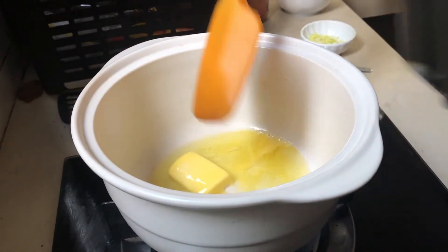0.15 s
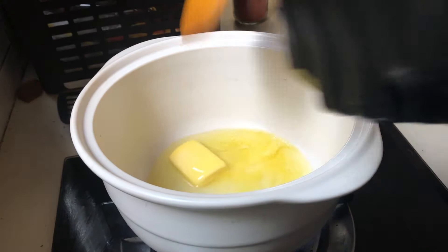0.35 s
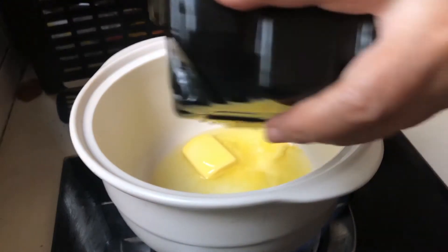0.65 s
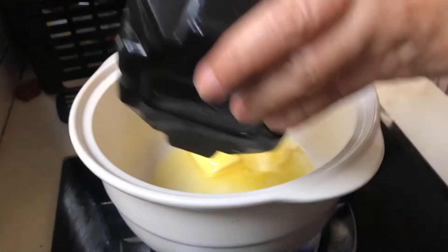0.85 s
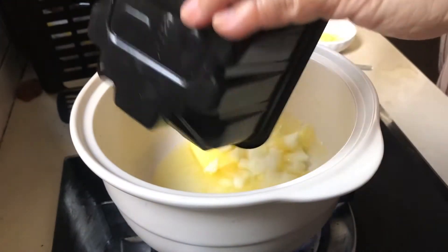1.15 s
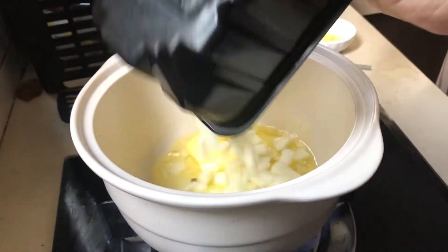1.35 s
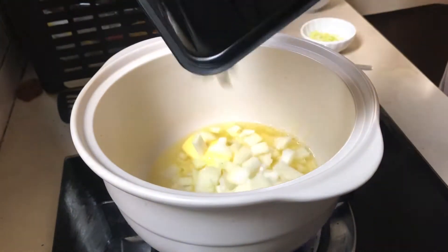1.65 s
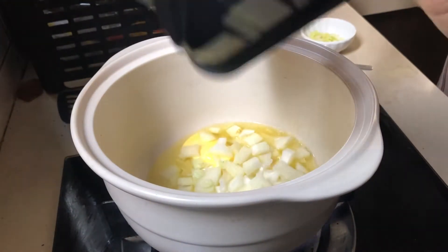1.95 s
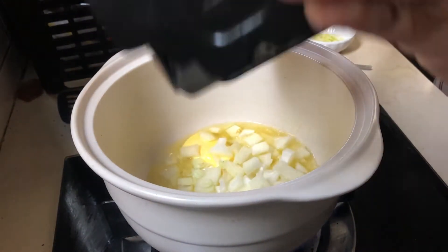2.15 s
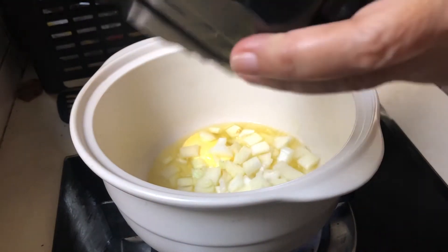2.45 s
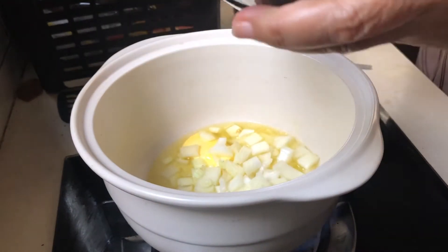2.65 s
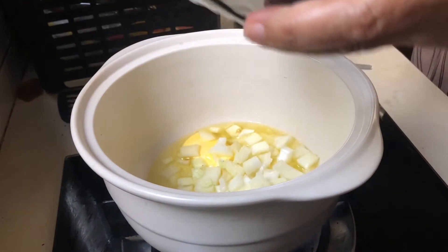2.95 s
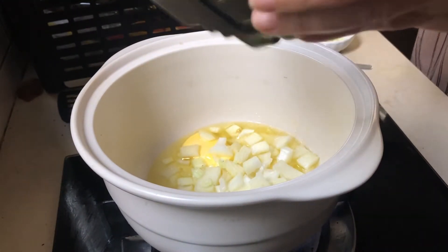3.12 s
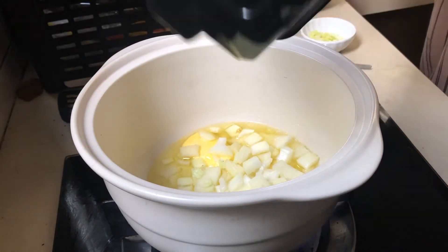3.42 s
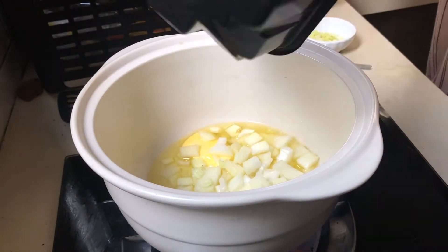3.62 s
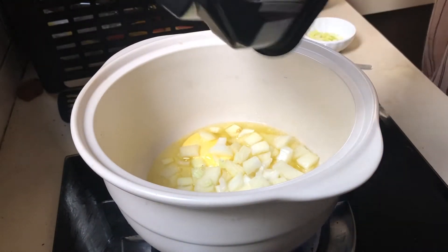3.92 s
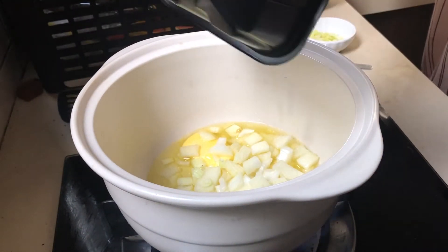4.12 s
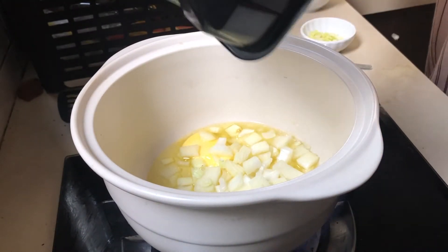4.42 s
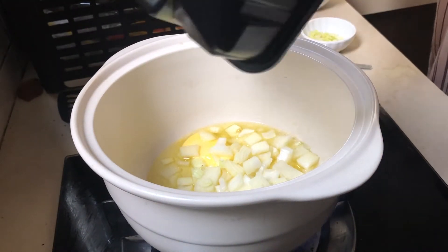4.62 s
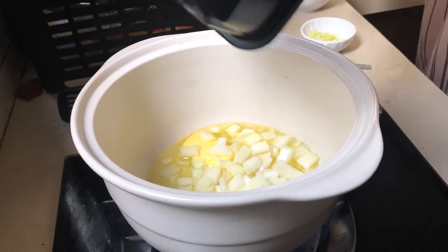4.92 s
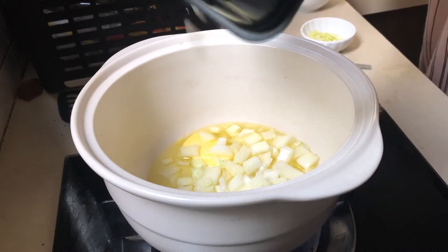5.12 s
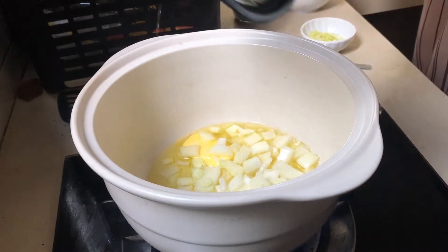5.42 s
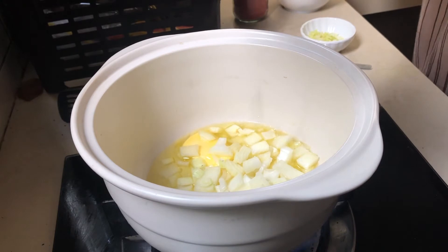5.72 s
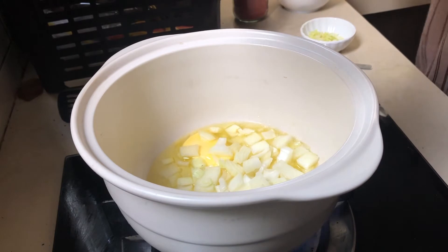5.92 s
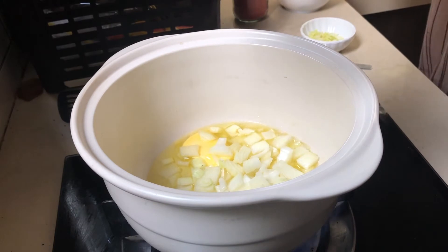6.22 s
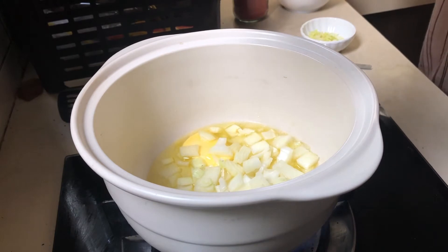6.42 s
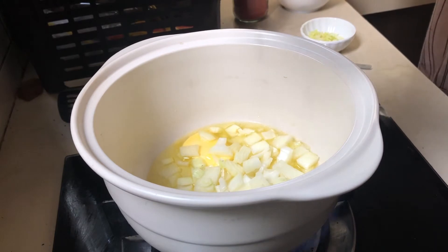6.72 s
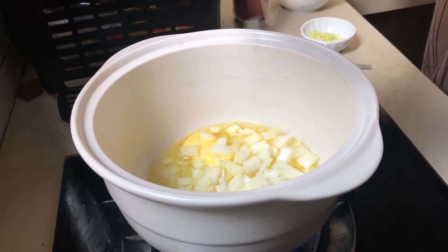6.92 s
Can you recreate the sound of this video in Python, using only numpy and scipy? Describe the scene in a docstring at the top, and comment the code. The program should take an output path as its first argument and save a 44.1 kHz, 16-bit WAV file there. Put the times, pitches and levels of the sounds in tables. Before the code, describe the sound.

Close, dry kitchen sound in one channel. Butter fizzes faintly over a low fluttering gas flame, then diced onion rushes out of a thin plastic tub with a sharp knock and soft rattle. The sizzle swells with bright pops while a spatula taps and scrapes the tub, its bottom thudding loosely. Knocks thin out near the end as the crackling continues.

```python
"""In a kitchen, close up, diced onion is tipped from a thin plastic tub into hot butter in a stoneware pot.
Water droplets pop, crackle and sizzle in the fat: noise snaps that also ring the air of the pot.
A spatula taps and scrapes the tub (noise blows on tuned wall modes) and its bottom thuds as it flexes
(sagging swings), while the dice rattle out. A gas burner flutters low beneath, as slowly wavering noise."""
import sys
import numpy as np
from scipy import signal
from scipy.fft import rfft, irfft
from scipy.io import wavfile
from scipy.ndimage import uniform_filter1d

SR = 44100
rng = np.random.default_rng(int(sys.argv[2]) if len(sys.argv) > 2 else 0)


def wrap_up_sound(samples):
    """Save the sound to the file named by the first command line argument, as 16-bit audio."""
    columns = np.atleast_2d(samples).T
    # keep every value between -1 and 1, then stretch to whole-number steps
    tamed = np.clip(columns, -1, 1)
    steps = np.round(tamed * 32767).astype(np.int16)
    wavfile.write(sys.argv[1], SR, steps)


N = 311787  # length in samples

# Loud droplets bursting in the fat. Each row: start in seconds, peak in dB before POP_DB, pitch in Hz.
DROPLET_POPS = [(0.018, -29, 9100), (0.1235, -24, 6200), (0.6467, -27, 6200), (0.6817, -24, 10900),
                (1.0667, -24, 9500), (1.0856, -18, 11200), (1.0898, -20, 6600), (1.1358, -19, 6600),
                (1.3045, -19, 5800), (1.457, -22, 9300), (1.5596, -23, 9300), (1.814, -23, 8400),
                (1.8226, -21, 10900), (1.8354, -19, 6100), (1.9413, -16, 11100), (1.9848, -20, 12200),
                (2.0154, -17, 7500), (2.0434, -14, 8600), (2.1098, -16, 7200), (2.1189, -21, 11800),
                (2.1601, -20, 9100), (2.2624, -18, 7200), (2.2986, -16, 7900), (2.3407, -21, 6900),
                (2.4096, -23, 10500), (2.4586, -21, 7700), (2.4758, -12, 6200), (2.5041, -17, 5400),
                (2.5195, -21, 8700), (2.5329, -17, 8800), (2.5662, -17, 8900), (2.5823, -17, 6200),
                (2.5924, -18, 8200), (2.6009, -20, 9000), (2.6628, -18, 8400), (2.711, -11, 7300),
                (2.7442, -13, 6900), (2.7592, -20, 10200), (2.7664, -15, 6200), (2.7987, -21, 12600),
                (2.9422, -23, 10800), (2.9639, -14, 7700), (3.039, -19, 7900), (3.1082, -14, 7900),
                (3.1233, -15, 5700), (3.2026, -23, 10500), (3.2092, -20, 5200), (3.2236, -24, 5800),
                (3.2322, -21, 5900), (3.2573, -23, 11500), (3.2631, -19, 7100), (3.2741, -21, 5200),
                (3.283, -20, 5200), (3.291, -22, 5900), (3.2931, -18, 9400), (3.3108, -22, 6000),
                (3.3418, -21, 12100), (3.3606, -19, 10200), (3.4402, -16, 11700), (3.4609, -19, 8300),
                (3.5724, -18, 10100), (3.5948, -14, 5500), (3.6586, -15, 10800), (3.6712, -15, 6000),
                (3.7264, -15, 9600), (3.7386, -10, 5600), (3.7963, -18, 12400), (3.8077, -19, 8400),
                (3.8553, -18, 8100), (3.9136, -20, 10000), (4.0147, -21, 10100), (4.0801, -19, 5600),
                (4.0971, -20, 8000), (4.1211, -20, 11300), (4.1715, -23, 10100), (4.2359, -19, 7100),
                (4.25, -20, 8300), (4.291, -12, 12500), (4.3156, -19, 8100), (4.3904, -19, 6900),
                (4.4009, -14, 11400), (4.4397, -20, 7100), (4.452, -15, 13000), (4.5432, -22, 7300),
                (4.567, -11, 8500), (4.5875, -11, 13200), (4.6121, -17, 5500), (4.6327, -14, 6300),
                (4.6977, -19, 11800), (4.7311, -22, 8100), (4.7481, -22, 9800), (4.7678, -19, 10800),
                (4.852, -22, 9800), (4.9276, -14, 11500), (4.9387, -21, 7800), (4.9687, -16, 5800),
                (4.9777, -18, 13300), (4.9876, -13, 10100), (5.0293, -13, 5700), (5.0871, -18, 10600),
                (5.1181, -14, 5000), (5.1551, -19, 5200), (5.165, -21, 8300), (5.1738, -22, 9300),
                (5.18, -22, 11400), (5.2103, -12, 8200), (5.2589, -18, 11400), (5.2715, -19, 11900),
                (5.2941, -20, 12000), (5.3259, -20, 6900), (5.3363, -20, 8500), (5.3581, -16, 9100),
                (5.3715, -10, 6000), (5.4642, -20, 7400), (5.5098, -23, 11400), (5.5238, -21, 9100),
                (5.5808, -14, 11000), (5.621, -20, 6400), (5.6759, -19, 9800), (5.7403, -15, 8300),
                (5.7633, -20, 8200), (5.8133, -21, 5500), (5.825, -27, 3600), (5.8985, -23, 4200),
                (6.0482, -24, 6500), (6.1069, -19, 5500), (6.1476, -17, 6600), (6.1781, -19, 10300),
                (6.2277, -18, 5200), (6.2687, -26, 6100), (6.3223, -19, 7000), (6.3401, -20, 5200),
                (6.3543, -20, 9000), (6.3644, -23, 7000), (6.4191, -17, 6900), (6.4787, -21, 8300),
                (6.5003, -14, 10300), (6.523, -24, 9000), (6.5368, -7, 10300), (6.5442, -17, 9200),
                (6.596, -18, 7500), (6.5988, -13, 7800), (6.6086, -14, 9300), (6.6738, -18, 6900),
                (6.6956, -22, 9200), (6.7453, -14, 7900), (6.8543, -23, 8000), (6.9535, -23, 8200),
                (7.0295, -13, 10100)]
# Knocks on the tub. Each row: time in seconds, peak in dB, low wall modes in dB and upper modes in dB,
# both against the modes near 1.1 kHz.
TUB_KNOCKS = [(0.1222, -25, -4, 3), (0.5058, -38, -1, -16), (0.649, -34, 2, -12), (0.715, -30, -8, -13),
              (0.7339, -27.5, -13, 6), (0.7716, -26.5, 23, -9), (0.7903, -24.5, -16, -6.5),
              (0.8398, -18, -6, -4), (0.8646, -10.5, -9, 20), (0.938, -24, -3, -15), (1.012, -35, 2, -8),
              (1.0376, -19, 2, -5), (1.059, -22, -3, -9), (1.089, -21.5, -9, 1), (1.101, -27, -1, -4),
              (1.118, -22, -6, -1), (1.202, -26, -7, -1), (1.2476, -19.5, -1, -2.5), (1.285, -32, 10, -8),
              (1.321, -30, 6, 3), (1.347, -24.5, 10, 6), (1.367, -24.5, 19, -16), (1.399, -26, 15, -20),
              (1.476, -31.5, 6, -2), (1.514, -30, 4, -12), (1.631, -33, 14, -14), (1.86, -34.5, 8, -10),
              (1.963, -29, -10, 0), (2.0111, -23, -1, -2), (2.128, -30, 1, -20), (2.191, -15, -10, -10),
              (2.1965, -6, -10, -2.5), (2.2947, -23.5, -8, -6), (2.3361, -25, -26, -13),
              (2.6272, -12.5, -1.5, -7.5), (2.7469, -22.5, -9, -3.5), (2.791, -13.5, 2.5, -8),
              (2.825, -18, -22, -21), (2.8779, -20, -6, 2), (2.945, -21.5, -8, -4),
              (2.973, -15, -5.5, -0.5), (3.0157, -13, -5.5, -5), (3.13, -22.5, -3, -12),
              (3.139, -19, -7, -2), (3.15, -27, -5, -10), (3.3185, -16.5, -4, -7), (3.348, -21, -6, -5),
              (3.357, -20, -12, -9), (3.3699, -13.5, -4, 3), (3.4231, -21, -0.5, -4),
              (3.5078, -19.5, -22, 0), (3.5347, -24, -40, -4), (3.6252, -28.5, -32, -1),
              (3.679, -16.5, 2, -2.5), (3.764, -32, 5, -3), (3.795, -25, 7, 3), (3.8152, -8.5, -6, -3),
              (3.8491, -16.5, -3, 5), (3.8819, -14.5, -5.5, -12), (3.998, -25.5, -25, -6),
              (4.0196, -19, 9, 1.5), (4.0872, -26.5, -7, -6), (4.1048, -17, -6, 1),
              (4.2205, -24.5, -2.5, -5.5), (4.4582, -18, -3, 5), (4.5146, -24.5, -1, -3),
              (4.691, -34.5, 1, -3), (4.881, -8.5, -9, -5), (4.929, -24, 4, 1), (4.941, -17, -4, -1),
              (5.031, -9.5, -10, 7), (5.0733, -16.5, -18, -15), (5.135, -18.5, 1, -3.5),
              (5.3655, -14.5, -3, -3.5), (5.4916, -17, -0.5, -8.5), (5.6057, -23, -7, 13),
              (5.8, -33, -16, -4), (5.863, -26.5, -10, -6.5), (5.9838, -16, -10.5, -5),
              (6.136, -20, 1, -5.5), (6.209, -32.5, -20, -6), (6.2454, -29.5, -12, -9),
              (6.34, -26.5, 2, -3.5), (6.3824, -24, -5, -10), (6.421, -26, -17, -21),
              (6.444, -23.5, -16, -6), (6.75, -25.5, -1, -7), (6.765, -17, -3, -1.5),
              (6.8348, -24, -12, -7), (6.9047, -36, -11, 7), (6.916, -28, -6, -9), (6.964, -31, -18, 0)]
# The bottom of the tub flexes. Each row: time of the peak in seconds, peak in dB, pitch at the peak in Hz.
BOTTOM_THUDS = [(0.511, -28.5, 257), (2.017, -17, 254), (2.113, -23, 217), (2.206, -21.5, 230),
                (2.761, -19.5, 112), (2.808, -25, 162), (2.973, -23, 215), (3.014, -22.5, 187),
                (3.032, -18.5, 133), (3.142, -17.5, 155), (3.379, -14, 201), (3.453, -16.5, 270),
                (3.52, -20.5, 181), (3.695, -28, 159), (3.801, -18.5, 208), (3.83, -11, 198),
                (4.119, -20, 92.8), (4.471, -21.5, 198), (4.525, -19.5, 175), (4.9, -17, 232),
                (4.961, -17.5, 160), (5.043, -24, 157), (5.147, -24, 170), (5.374, -16.5, 158),
                (5.501, -12.5, 148), (5.868, -29, 190), (5.99, -19, 291), (6.145, -21, 226),
                (6.344, -28.5, 297), (6.431, -27, 188), (6.647, -22, 124), (6.909, -26, 263),
                (6.937, -33, 230)]
# Onion dice slide out in a rush, then trickle. Each row: time in seconds, relative level in dB.
DICE_SLIDE = [(.68, -81), (.83, -53), (.88, -28), (.93, -31), (.99, -38), (1.05, -44), (1.2, -45.5),
              (1.39, -49.5), (1.44, -53), (1.52, -62), (1.75, -59)]
# How lively the fat is. Each row: time in seconds, level in dB that the crackle and hiss are set against.
FAT_HEAT = [(0, -50), (.4, -59), (.7, -54), (.87, -40), (.98, -48.5), (1.1, -37), (1.3, -45.5), (1.7, -46),
            (2.0, -40), (2.35, -41.5), (2.58, -39), (2.9, -42), (3.05, -38.5), (3.18, -44.5), (3.3, -39),
            (3.6, -43), (4.1, -43), (4.45, -41), (4.75, -43.5), (5.2, -39.5), (5.6, -43.5), (5.9, -46.5),
            (6.55, -42.5), (7.07, -44)]
# Tub wall modes in four groups: main, low, upper, crack. Each row: pitch in Hz, relative level in dB,
# free decay to -60 dB in seconds, before RING_SHARE.
WALL_MODES = [
    [(990, 0, .045), (1070, 0, .05), (1190, 2, .05), (1320, -3, .03)],
    [(585, -2, .045), (640, 0, .05), (730, -2, .035)],
    [(1560, -2, .02), (1830, 0, .025), (2110, 0, .02), (2350, -3, .015)],
    [(2750, 0, .01), (3150, 0, .01), (3800, -1, .008), (4600, -3, .006)],
]
# Air modes of the pot. Each row: pitch in Hz, gain in dB, decay to -60 dB in seconds.
POT_AIR_MODES = [(1325, 16.5, 0.022), (2600, -3, 0.009)]
# Colour of the fine hiss. Each row: frequency in Hz, relative density in dB per Hz.
HISS_COLOUR = [(880, 1), (1500, 7), (1960, 1), (3550, 7.5), (3960, 3), (5440, 6), (7920, 3.5), (15200, 4),
               (16000, 3.5)]
# Colour of burner and room. Each row: frequency in Hz, relative density in dB per Hz.
KITCHEN_COLOUR = [(18, -51), (30, -10.5), (124, -3), (149, 2), (194, -4.5), (280, -14.5), (384, -14),
                  (415, -18), (449, -20), (499, -19.5), (3220, -34.5), (16000, -50.5)]

POP_DB = 2  # added to every pop: the snap overshoots before the top is cut
CRACKLES_PER_S = 75
CRACKLE_DB, FINE_DB = 13.5, -1.5  # against the level of the fat
SURGE_DB = 2.07  # uneven boiling
CRACK_DB, CRACK_PER_EDGE = -0.5, 1.15  # the crack grows faster than the upper modes towards the rim
RING_SHARE = .55  # the hand on the tub shortens every ring
THUD_TURNS = 1.4  # from the start of a thud to its peak, in periods of its peak pitch
SCRAPE_DB, SCRAPE_S = -54.5, 0.039  # spatula drag around every knock: level, reach
DICE_PER_S = 1400
KITCHEN_DB = -42  # RMS
TOP_HZ = 16000


def undb(db):
    """Turn dB into an amplitude factor."""
    return 10 ** (np.asarray(db) / 20)


def unit(x):
    """Scale to an RMS of 1."""
    return x / np.sqrt(np.mean(x ** 2))


def curve(table):
    """Draw a dB line through (seconds, dB) points, at -120 dB before the first."""
    s, db = np.transpose(table)
    return np.interp(np.arange(N) / SR, s, db, left=-120)


def colour(x, points):
    """Shape a noise to (Hz, dB) points."""
    hz, db = np.transpose(points)
    f = np.maximum(np.arange(N // 2 + 1) * SR / N, 1)
    gain = undb(np.interp(np.log(f), np.log(hz), db))
    return irfft(rfft(x) * gain, N)


def filtered(x, order, edges_hz, kind):
    """Pass x through a Butterworth filter."""
    return signal.lfilter(*signal.butter(order, edges_hz, kind, fs=SR), x)


def ring(x, hz, t60):
    """One decaying mode driven by x."""
    pole = np.exp(2j * np.pi * hz / SR - np.log(1000) / (t60 * SR))
    return signal.lfilter([1], [1, -pole], x).imag


def walk(rate):
    """Random levels held 1 / rate s and slewed; spread near 1."""
    hold = int(SR / rate)
    steps = np.repeat(rng.standard_normal(N // hold + 1), hold)
    slewed = uniform_filter1d(uniform_filter1d(steps, hold), hold)
    return 1.3 * slewed[:N]


def add(out, s, sound, db):
    """Mix a short sound in at time s with the given peak."""
    i = max(int(s * SR), 0)
    scaled = undb(db) / np.abs(sound).max() * sound
    out[i:i + len(sound)] += scaled[:N - i]


def echo(x, t60, db, damp_hz):
    """A diffuse tail of many reflections, made of decaying dulled noise."""
    t = np.arange(int(t60 * SR)) / SR
    tail = rng.standard_normal(len(t)) * 1000. ** (-t / t60) * np.minimum(t / 0.0001, 1)
    tail = filtered(tail, 1, min(damp_hz, .45 * SR), "low")
    tail = tail / np.sqrt(np.sum(tail ** 2))
    return x + undb(db) * signal.fftconvolve(x, tail)[:N]


def burst(hz, spit_s=0.0038, spit_db=-21, pot_s=0.0041, pot_db=-30, tone=1.28, ring_s=0.00045, edge=0.9):
    """A steam bubble tears open: a wide snap leaning to its own pitch, a spit of fat, echoes off the pot wall."""
    t, hiss = np.arange(1100) / SR, rng.standard_normal(1100)
    snap = np.sign(hiss) * np.exp(-(t / .00028) ** 2)
    spit = undb(spit_db) * np.exp(-t / spit_s)
    pot_echo = undb(pot_db) * np.exp(-t / pot_s)
    noise = snap + hiss * (spit + pot_echo)
    # small bubbles move too little air to reach far below their pitch
    wide = filtered(noise, 3, max(2200, .3 * hz), "high")
    sharp = np.diff(wide, n=2, prepend=[0, 0])
    # low bubbles ring longer
    pitched = ring(np.diff(noise, prepend=0), hz, ring_s * (9100.0 / hz) ** 2)
    return unit(wide) + edge * unit(sharp) + tone * unit(pitched)


def fat():
    """Loud pops, a random crackle of smaller ones that comes in surges and a hiss of the finest."""
    heat = undb(curve(FAT_HEAT))
    pops, push, crackle = np.zeros(N), np.zeros(N), np.zeros(N)
    for s, db, hz in DROPLET_POPS:
        add(pops, s, burst(hz), db + POP_DB)
        # big, low bubbles shove the air column of the pot hardest
        add(push, s, rng.standard_normal(40), db - 41.0 - 7 * np.log2(hz / 5000))
    air = sum(undb(db) * ring(push, hz, t60) for hz, db, t60 in POT_AIR_MODES)
    for place, size, octave in rng.random((CRACKLES_PER_S * N // SR, 3)):
        # many weak crackles, a few strong ones
        add(crackle, place * N / SR, burst(4000 * 2 ** (1.9 * octave)), -5 * np.log(size + .08))
    fine = rng.standard_normal(N) * undb(4 * walk(200) + 1.5 * walk(40))
    fizz = undb(CRACKLE_DB) * crackle + undb(FINE_DB) * unit(colour(fine, HISS_COLOUR))
    surge = undb(SURGE_DB * walk(21.93))
    return pops + air + heat * surge * fizz


def knock(groups_db, contact_s=0.0017, rattle_s=0.021, rattle_db=-18):
    """A soft edge skids on the wall for a few ms and the thin plastic ticks on in scattered clicks;
    each blow lands elsewhere and weights the modes anew."""
    t = np.arange(5000) / SR
    skid = t / contact_s * np.exp(1 - t / contact_s)
    chatter = undb(7 * np.repeat(rng.standard_normal(50), 100))
    shape = skid + undb(rattle_db) * chatter * np.exp(-t / rattle_s)
    out = 0
    for modes, group_db in zip(WALL_MODES, groups_db):
        edges_hz = (.85 * modes[0][0], 1.2 * modes[-1][0])
        force = filtered(rng.standard_normal(5000) * shape, 2, edges_hz, "band")
        # random dB and pitch shift for each mode
        spots = rng.standard_normal((len(modes), 2)) * (3, .04)
        part = sum(undb(db + lean_db) * ring(force, hz * (1 + bend), RING_SHARE * t60)
                   for (hz, db, t60), (lean_db, bend) in zip(modes, spots))
        out = out + undb(group_db) * part / np.abs(part).max()
    return out


def thud(hz, length_s, sag=0.48, ring_on=2.03, shove=0.31, flap=0.33):
    """A short swing of the panel that sags in pitch as it slackens; it peaks after one length.
    The whole tub shoves the air once, and looser patches flap above the pitch."""
    peak = int(length_s * SR)
    u = np.arange(int(5 * length_s * SR)) / (length_s * SR) - 1  # in lengths, 0 at the peak
    phase = 2 * np.pi * np.cumsum(hz * np.exp(-sag * np.clip(u, -1, 2))) / SR
    phase = phase - phase[peak] + rng.uniform(-np.pi, np.pi)
    swing = np.where(u < 0, np.cos(np.pi / 2 * u) ** 2, 1 / np.cosh(ring_on * u))
    patches = unit(ring(np.diff(rng.standard_normal(len(u) + 1)), 314, 0.032))
    return swing * (np.cos(phase) + shove * np.cos(phase / 2) + flap * patches)


def rubbing():
    """Dice and spatula scrape drive the same walls with many small random blows."""
    t = np.arange(N) / SR
    scrape = undb(SCRAPE_DB) * sum(np.exp(-((t - row[0]) / SCRAPE_S) ** 2) for row in TUB_KNOCKS)
    level = 2 * undb(curve(DICE_SLIDE)) + scrape
    # every piece lands as a soft blow about a millisecond long, each with its own weight
    lands = (rng.random(N) < DICE_PER_S / SR) * undb(2.5 * rng.standard_normal(N))
    blows = .03 + np.convolve(lands, np.hanning(90), "same")
    dice = rng.standard_normal(N) * blows * level
    walls = filtered(dice, 2, (480, 1900), "band")  # wet pieces land softly
    rattle = sum(undb(group_db + db) * ring(walls, hz, RING_SHARE * t60) * hz / 1000
                 for modes, group_db in zip(WALL_MODES, (-36.5, -27.5, -40.5, -47))
                 for hz, db, t60 in modes)
    low = filtered(dice, 2, 130, "high")
    belly = undb(-31.5) * ring(low, 218, 0.024) + undb(-25.5) * ring(low, 315, 0.022)
    return rattle + belly


def tub():
    """Knocks, thuds and rubbing share one short diffuse tail."""
    out = np.zeros(N)
    for s, db, low_db, upper_db in TUB_KNOCKS:
        crack_db = CRACK_DB + CRACK_PER_EDGE * upper_db
        # starts early, as the skid takes a moment to build
        add(out, s - .0015, knock([0, low_db, upper_db, crack_db]), db)
    for s, db, hz in BOTTOM_THUDS:
        length_s = THUD_TURNS / hz
        add(out, s - length_s, thud(hz, length_s), db)
    return echo(out + rubbing(), t60=0.28, db=-14.0, damp_hz=3160)


def kitchen():
    """The burner flame flutters low over the hush of the room: one coloured noise of wavering level."""
    flutter = undb(2.0 * walk(11) + 0.24 * walk(1.38))
    return undb(KITCHEN_DB) * unit(colour(rng.standard_normal(N) * flutter, KITCHEN_COLOUR))


def scene():
    """Mix fat, tub and kitchen to one channel."""
    return (fat() + tub() + kitchen())[None]


def record(dry):
    """Deep bass rolls off gently below 50 Hz; the top ends steeply at TOP_HZ."""
    low_cut = signal.sosfilt(signal.butter(2, 50, "high", fs=SR, output="sos"), dry)
    return signal.sosfilt(signal.ellip(10, .2, 70, TOP_HZ, fs=SR, output="sos"), low_cut)


dry = scene()
out = record(dry)
wrap_up_sound(out)
```